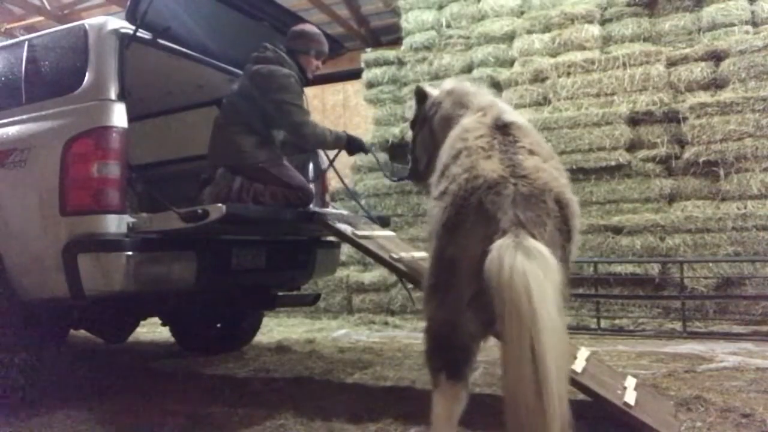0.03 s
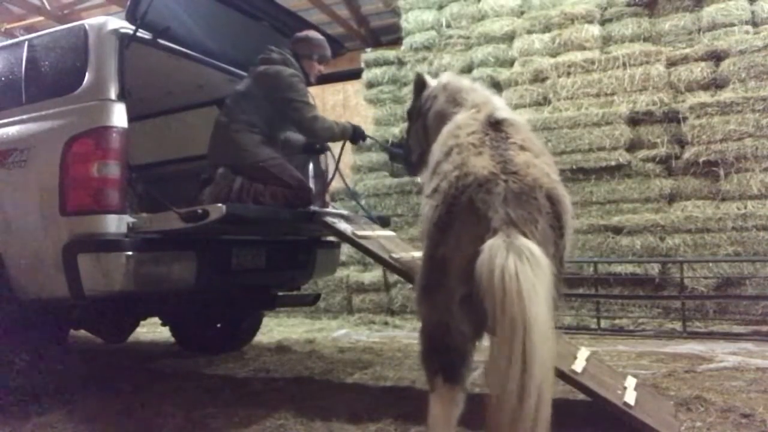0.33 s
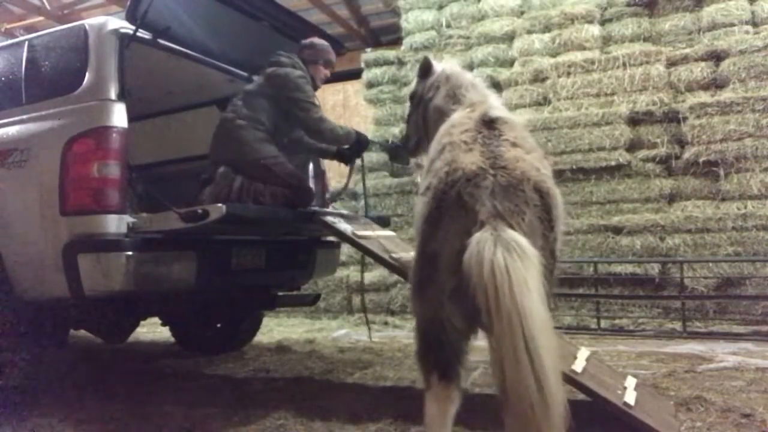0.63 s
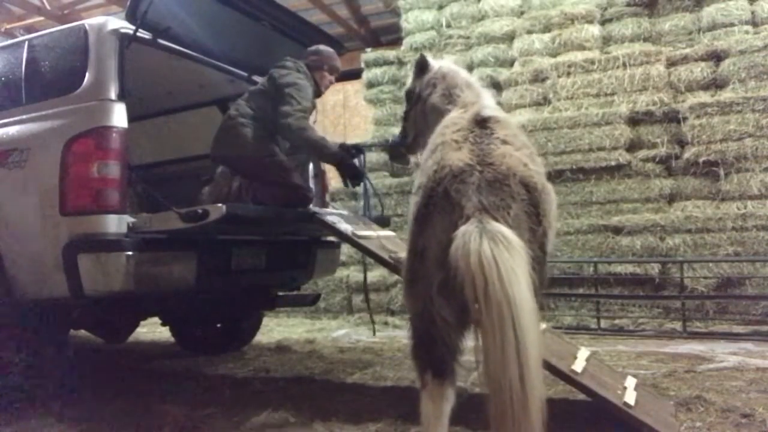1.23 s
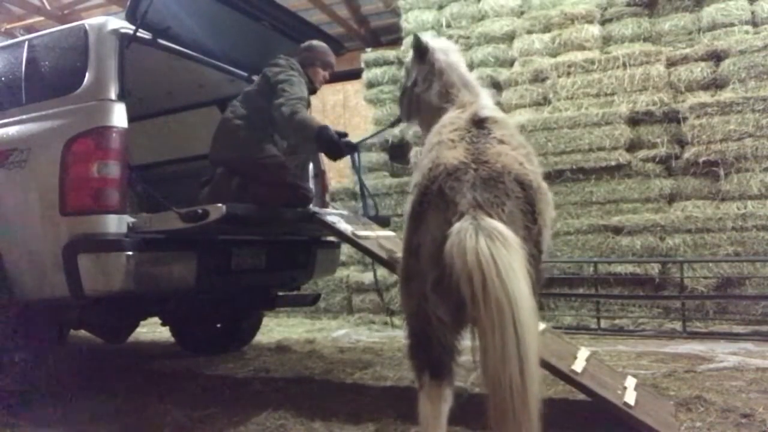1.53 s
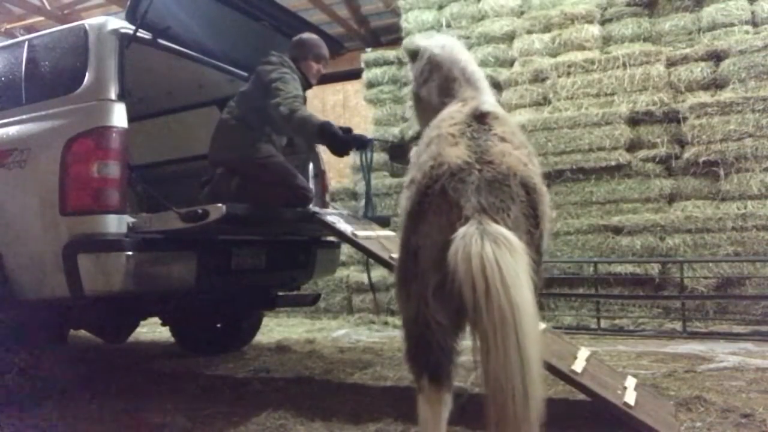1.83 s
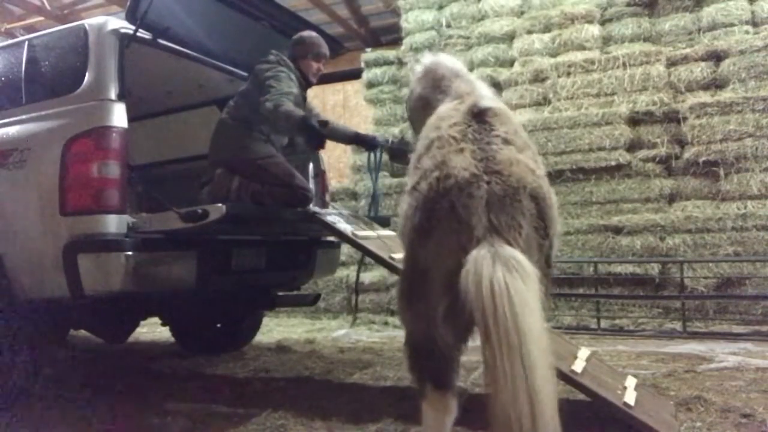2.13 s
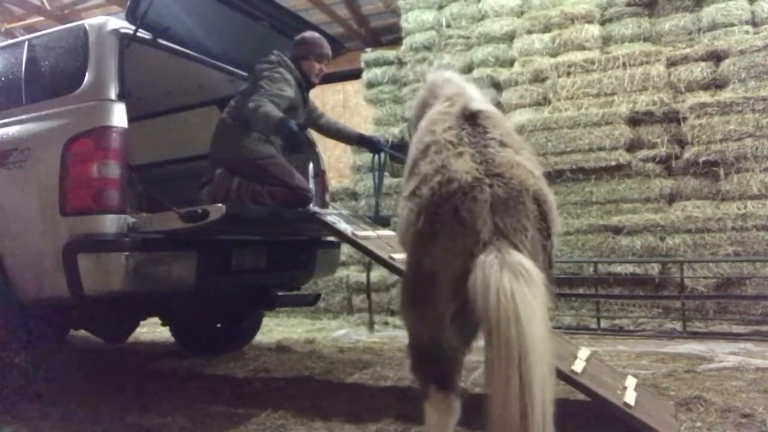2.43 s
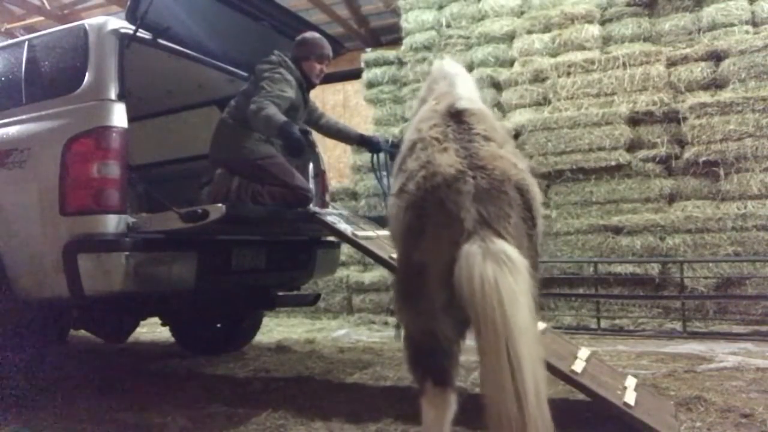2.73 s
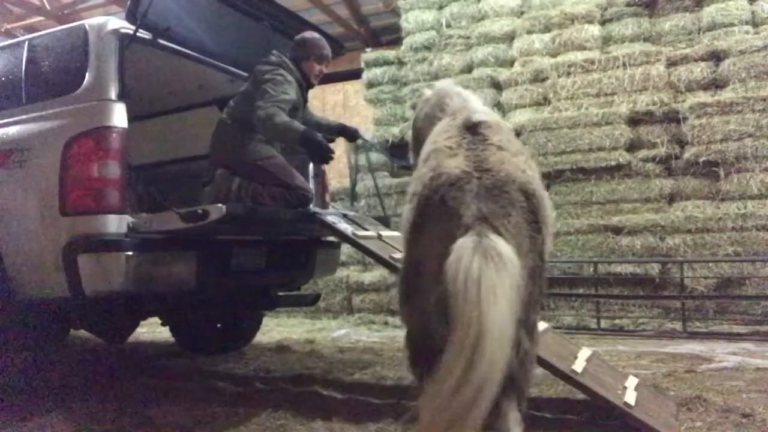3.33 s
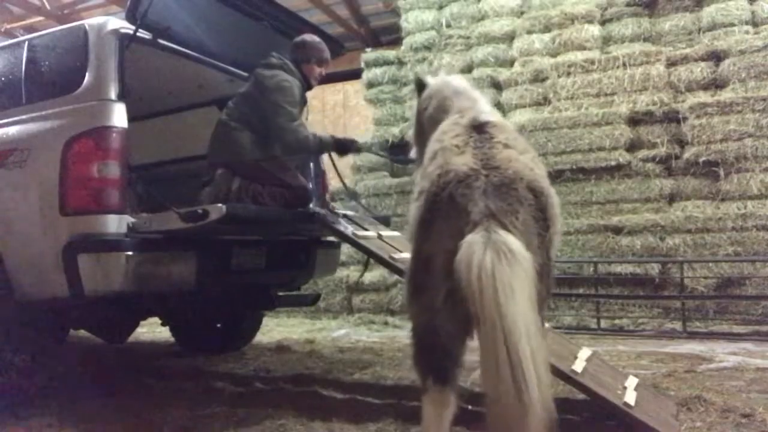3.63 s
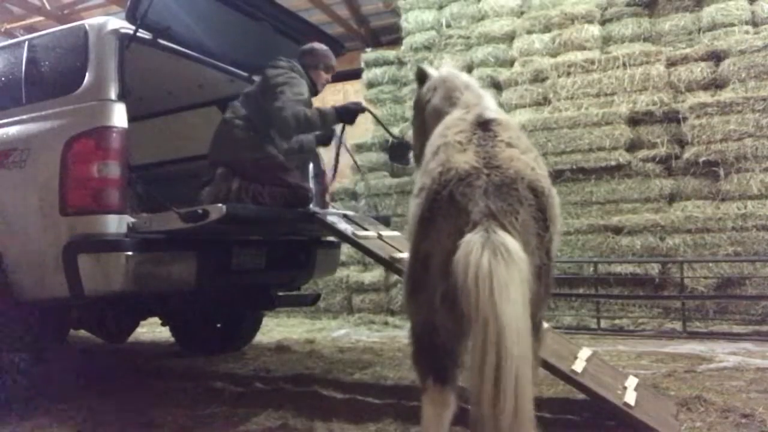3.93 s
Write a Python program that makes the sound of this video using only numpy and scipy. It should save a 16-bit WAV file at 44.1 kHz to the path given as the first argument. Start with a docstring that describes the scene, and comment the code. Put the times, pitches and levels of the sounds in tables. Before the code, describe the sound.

A pony's hooves knock and boom on a wooden ramp in a quiet barn.

```python
"""A pony paws and steps on a wooden ramp that leans on a truck's tailgate, in a quiet hay barn.
First its hooves crack down: the boards boom, the truck sways, loose fittings rattle and the barn rings.
A lull follows, with soft scuffs, a faint hollow clop and ticks of tack and straw. Near 2 seconds a small
metal piece clicks sharply twice. Then come three heavy steps, each a quick cluster of hoof hits.
Still air hisses faintly from start to end."""
import sys
import numpy as np
from scipy import signal
from scipy.io import wavfile

SR = 44100
rng = np.random.default_rng(int(sys.argv[2]) if len(sys.argv) > 2 else 0)


def dump(signal):
    """Clip the signal to [-1, 1] and save it as 16-bit WAV at the path in sys.argv[1]."""
    limited = np.clip(np.atleast_2d(signal).T, -1, 1)
    pcm = np.round(limited * 32767).astype(np.int16)
    wavfile.write(sys.argv[1], SR, pcm)


N = 176400  # 4 seconds

# A gain_db adds to a sound's other decibels. A ring_s is the time it takes to fade by 60 dB.
# Each hoof hit: start_s, rumble_db, thud_db, knock_db, grit_db, clop_hz, clop_db, hardness_db
HOOF_HITS = [(.031, -11, -11, -13.5, -12.5, 800, 0.5, 6.5), (.043, -16, -14, -4.5, -10, 1500, 6, 3.5),
             (.062, 2, -10, -3, -9, 854, -4, 6), (.099, -4, -10.5, -6.5, -11, 340, 7, 5),
             (.126, -5, -6, -11, -32, 335, 9, 2.5), (.15, -11, -10.5, -9.5, -37, 126, 9, -16),
             (.485, -1.5, -25.5, -26.5, -33, 327, 2.5, -12), (.578, -9, -17.5, -19.5, -20, 950, 2, -3.5),
             (1.937, -17, -19, -20, -17, 700, 2, -11), (2.066, -21, -12.5, -26.5, -16, 206, -1.5, -7.5),
             (2.318, -24.5, -18.5, -21, -27, 1260, -2.5, 5), (2.374, -1.5, 6.5, 2.5, 3.5, 1065, 8, -6),
             (2.4413, 8.5, 0.5, -0.5, 1, 1300, 8.5, 3.5), (2.461, -13.5, 6.5, -1, -5.5, 1130, 9, 1.5),
             (2.512, -9, 0.5, -12.5, -25, 1450, -1, -5), (2.781, -10, -15, -19.5, -33, 202, 9.5, -4),
             (2.795, -3, -6.5, -10, -30, 520, 15, 4.5), (2.809, 1, 3.5, -2.5, 2.5, 164, 2.5, 1.5),
             (2.853, 1, -1.5, -5.5, -7, 310, 9, 4), (2.863, 6, -3, -11.5, -12, 635, 10, 3),
             (2.882, -5, -6.5, -11.5, -17, 600, 6, 5.5), (2.976, -6.5, -16.5, -19, -11, 190, 1, -10),
             (3.319, -4.5, -9, -21.5, -30, 204, -2, -0.5), (3.644, 5, -15, -8, -9, 800, 2, 3.5),
             (3.654, -2, 2, -17, -21, 177, 3, 8.5), (3.659, 2, -5.5, -4.5, -5.5, 480, 8, 3),
             (3.683, -3.5, -7, -5.5, -26, 755, 11, 7), (3.714, -9, -16, -9, -25, 1030, 7.5, 4.5)]
HOOF_TONE_HZ = (60, 180, 400, 1400, 2400)  # rumble, thud, low and high end of the knock, grit
CLOP_WIDTH_OCTAVES = 0.4
# The notes the wooden ramp rings with: pitch_hz, gain_db, ring_s
RAMP_NOTES = [(86.6, -38.5, 0.49), (111.6, -46.5, 0.3), (167.4, -25.5, 0.13), (190.24, -28, 0.65),
              (300, -33.5, 0.12), (335, -35.5, 0.47), (515.4, -40.5, 0.34), (575, -37.5, 0.12),
              (706.4, -40.5, 0.27), (809, -40.5, 0.16), (936, -43, 0.24), (988, -49.5, .22),
              (1128, -48.5, 0.29), (1270, -64.5, .28), (1318, -49, 0.12)]
NOTE_SCATTER_DB = 1.5
SWAY_HZ, SWAY_DB, SWAY_RING_S, SWAY_RISE_S = 37.2, -39, 0.71, 0.13
# The tone of hoof striking wood: pitch_hz, gain_db
IMPACT_TONE = [(40, -25), (100, -11.5), (180, -2), (400, -11.5), (1000, -13), (1800, -27), (3500, -25),
               (4800, -37.5), (6000, -54), (15000, -59.5)]
# How long that strike lasts: pitch_hz, ring_s
IMPACT_FADE = [(150, 0.12), (1000, 0.11), (4000, 0.018)]
IMPACT_DB, IMPACT_RISE_S = -51, 0.00044
# The tone of the barn's echo of a hoof: pitch_hz, gain_db
BARN_TONE = [(30, -10), (60, -7), (110, -1.5), (190, 4), (400, -5), (1000, -15), (1800, -23), (4000, -36),
             (5500, -50.5), (15000, -58.5)]
# How long the barn echoes: pitch_hz, ring_s
BARN_FADE = [(40, 1.19), (110, 0.83), (280, 0.48), (740, 0.55), (1940, 0.41), (5120, 0.49), (14000, 0.23)]
BARN_DB, BARN_RISE_S, BARN_BUILD_CYCLES = -55.5, 0.036, 0.62

# Each click of a small metal piece: start_s, gain_db, pitch_ratio, low_clack_db
CLICK_HITS = [(1.9098, -2, 0.92, -0.5), (2.3054, -8.5, 0.94, 10.5)]
# The notes of that piece: base_pitch_hz, gain_db, ring_s
METAL_NOTES = [(1464, -52, 0.099), (2420, -39, .025), (3540, -35.5, 0.025), (3960, -33, 0.014),
               (4340, -37, 0.016), (5360, -66, 0.016)]
# The tone of the dry clack in each click: pitch_hz, gain_db
CLACK_TONE = [(200, -25), (900, -3), (1600, 0.5), (4000, -1.5), (6000, -19.5), (15000, -26)]
CLACK_DB, CLACK_RING_S, CLACK_LOW_HZ, CLACK_HIGH_HZ = -71.5, 0.039, 1210, 4080
# The tone of the barn's echo of a click: pitch_hz, gain_db
CLICK_ECHO_TONE = [(200, 10), (900, 3.5), (1800, 1), (4000, -9), (6000, -18.5), (15000, -25)]
CLICK_ECHO_DB, CLICK_ECHO_RISE_S = -80, 0.024

# Rattles of ramp, tailgate and halter fittings, and one faint hollow clop (second row):
# start_s, pitch_hz, level_db, ring_s
RATTLES_AND_CLOP = [(0.045, 2430, -44, 0.096), (1.126, 740, -58, 0.13), (2.372, 4260, -49.5, 0.064),
                    (2.444, 4750, -51, 0.06), (2.502, 3960, -61.5, 0.31), (2.667, 2570, -63, 0.087),
                    (2.723, 4060, -59, 0.1), (2.806, 2330, -55, 0.067), (3.025, 2590, -63.5, 0.27),
                    (3.613, 2840, -63, 0.33), (3.657, 2750, -42, 0.11)]
RATTLE_Q, RATTLE_RISE_S = 35, 0.0023  # a higher Q gives a purer pitch
# A hoof's sharp crack on wood (first row), then ticks of tack (the pony's gear) and straw:
# start_s, low_gain_db, middle_gain_db, high_gain_db
CRACK_AND_TICKS = [(0.061, 10, 22, -2.5), (.080, 5, 11, -2), (.098, 3, 15.5, -5), (0.299, -20, 6, -15),
                   (0.392, 6, 3, -31), (0.537, 2, 3.5, -27), (0.986, -10, 4.5, -16), (1.122, 7, 2, -5),
                   (1.134, 22.5, -23, -11), (1.308, 10, 4, -0.5), (1.318, 19, -3, -7), (1.939, 0, 12, -0.5),
                   (2.433, 35, 21, -8), (2.468, 1, -1, -2), (2.669, 16, 4, -22), (2.719, -11, 12, -6),
                   (2.731, -5, 8, -8)]
TICK_TONE_HZ = (800, 3500, 12000)  # low, middle, high
TICK_DB, TICK_RING_S = -102, 0.05
# Each scuff or swish: peak_s, rise_s, fall_s, gain_db
SCUFF_SWELLS = [(.02, 0.046, 0.067, 10.5), (.52, 0.3, 0.056, -6.5), (0.932, 0.082, 0.088, -9.5),
                (2.802, .012, 0.019, 6), (3.201, 0.08, 0.088, 3), (3.3, 0.097, 0.044, 2.5),
                (3.644, 0.023, 0.007, 5)]
# The tone of the rubbing: pitch_hz, gain_db
SCUFF_TONE = [(100, 15), (400, 3), (1300, -2.5), (1900, -13), (2700, -7.5), (3500, -13.5), (4500, -13),
              (6500, -27), (15000, -28)]
SCUFF_DB, GRAIN_DB, GRAIN_S = -92.5, 2, 0.003
# The tone of still air and microphone hiss: pitch_hz, gain_db
AIR_TONE = [(25, -14), (45, -1.5), (100, -4), (200, -6.5), (400, -14.5), (1000, -15), (2000, -23.5),
            (5000, -31), (9000, -32.5), (10300, -43.5), (12000, -33), (15500, -46.5)]
AIR_DB = -84.5

# Noise is built from 30 slices of pitch, called bands.
BAND_EDGES_HZ = np.geomspace(24, 17000, 31)
BAND_CENTRES_HZ = np.sqrt(BAND_EDGES_HZ[1:] * BAND_EDGES_HZ[:-1])


def hooves():
    """Each hoof hit cracks on the wood, rings the ramp, rocks the truck and echoes in the barn."""
    times, rumble_db, *_, hardness_db = np.transpose(HOOF_HITS)
    tones = [hoof_tone(*hit[1:-1]) for hit in HOOF_HITS]
    hard_tones = [tone + [0, db] for tone, db in zip(tones, hardness_db)]
    impact = from_db(IMPACT_DB) * bursts(times, hard_tones, IMPACT_TONE, IMPACT_FADE, IMPACT_RISE_S)
    echo = from_db(BARN_DB) * bursts(times, tones, BARN_TONE, BARN_FADE, BARN_RISE_S, BARN_BUILD_CYCLES)
    return impact + ramp_boom(times, tones) + truck_sway(times, rumble_db) + echo


def hoof_tone(rumble_db, thud_db, knock_db, grit_db, clop_hz, clop_db):
    """One hit's (pitch_hz, gain_db) rows: a broad slope and a hollow clop set by where the hoof lands."""
    points = list(zip(HOOF_TONE_HZ, (rumble_db, thud_db, knock_db, knock_db, grit_db)))
    slope = at_pitch(points, BAND_CENTRES_HZ)
    octaves_away = np.log2(BAND_CENTRES_HZ / clop_hz)
    clop = clop_db * np.exp(-(octaves_away / CLOP_WIDTH_OCTAVES) ** 2)
    return np.column_stack([BAND_CENTRES_HZ, slope + clop])


def ramp_boom(times, tones):
    """Every hit rings all the ramp's notes, in a slightly different mix each time."""
    scatter_db = NOTE_SCATTER_DB * rng.standard_normal((len(times), len(RAMP_NOTES)))
    boom = 0
    for k, (hz, db, ring_s) in enumerate(RAMP_NOTES):
        force = from_db(db + scatter_db[:, k] + [at_pitch(tone, hz) for tone in tones])
        boom += (-1) ** k * ring(pulses(times, force), hz, ring_s)  # every other note swings down first
    return boom


def truck_sway(times, rumble_db):
    """The truck body booms slowly under the pony's weight."""
    load = pulses(times, from_db(SWAY_DB + rumble_db))
    short_ring_s = 1 / (1 / SWAY_RING_S + 1 / (SWAY_RISE_S * np.log(1000)))
    # Taking a short ring away from a long one makes the boom swell in.
    return ring(load, SWAY_HZ, SWAY_RING_S) - ring(load, SWAY_HZ, short_ring_s)


def metal_clicks():
    """A small metal piece rings briefly with a dry clack, and the barn echoes it."""
    metal, times, tones = 0, [], []
    for start_s, db, pitch_ratio, low_clack_db in CLICK_HITS:
        for k, (hz, note_db, ring_s) in enumerate(METAL_NOTES):
            tap = pulses([start_s], from_db(db + note_db))
            metal += (-1) ** k * ring(tap, hz * pitch_ratio, ring_s)
        times.append(start_s)
        tones.append([(CLACK_LOW_HZ, db + low_clack_db), (CLACK_HIGH_HZ, db)])
    clack = from_db(CLACK_DB) * bursts(times, tones, CLACK_TONE, [(1, CLACK_RING_S)], IMPACT_RISE_S)
    echo = from_db(CLICK_ECHO_DB) * bursts(times, tones, CLICK_ECHO_TONE, BARN_FADE, CLICK_ECHO_RISE_S)
    return metal + clack + echo


def rattles_and_clop():
    """Noise around one pitch dies away: high for rattling fittings, low for the faint hollow clop."""
    sound = 0
    for start_s, hz, db, ring_s in RATTLES_AND_CLOP:
        age_s = np.maximum(np.arange(N) / SR - start_s, 0)
        noise = signal.lfilter(*signal.iirpeak(hz, RATTLE_Q, fs=SR), rng.standard_normal(N))
        rise = 1 - np.exp(-age_s / RATTLE_RISE_S)
        fade = from_db(db - 60 * age_s / ring_s)
        sound += noise / noise.std() * rise * fade
    return sound


def crack_and_ticks():
    """Short snaps of noise, each with its own tone: a hoof cracks on wood, then tack and straw tick."""
    times = [snap[0] for snap in CRACK_AND_TICKS]
    tones = [list(zip(TICK_TONE_HZ, snap[1:])) for snap in CRACK_AND_TICKS]
    return bursts(times, tones, [(1, TICK_DB)], [(1, TICK_RING_S)], IMPACT_RISE_S)


def scuffs():
    """Grainy rubbing swells and fades as the pony drags a hoof or swings its tail."""
    t = np.arange(N) / SR
    power = 0
    for peak_s, rise_s, fall_s, db in SCUFF_SWELLS:
        width_s = np.where(t < peak_s, rise_s, fall_s)
        power += from_db(db) ** 2 * np.exp(-((t - peak_s) / width_s) ** 2)
    rubbing = sum(band for _, band in noise_bands(SCUFF_TONE))
    grain = np.interp(t / GRAIN_S, np.arange(N), rng.standard_normal(N))
    return np.sqrt(power) * from_db(SCUFF_DB + GRAIN_DB * grain) * rubbing


def still_air():
    """A faint, steady hush lies behind everything."""
    return from_db(AIR_DB) * sum(band for _, band in noise_bands(AIR_TONE))


def bursts(times, hit_tones, shared_tone, fade_table, rise_s, build_cycles=0):
    """A burst of noise after each hit. With build_cycles, low bands take longer to swell."""
    sound = 0
    for hz, noise in noise_bands(shared_tone):
        energy = pulses(times, from_db([at_pitch(tone, hz) for tone in hit_tones]) ** 2)
        fall_s = at_pitch(fade_table, hz) / np.log(1e6)  # 60 dB down is a millionth of the power
        swell_s = 1 / (1 / fall_s + 1 / (rise_s + build_cycles / hz))
        power = fading_tail(energy, fall_s) - fading_tail(energy, swell_s)
        sound += noise * np.sqrt(np.maximum(power, 0))
    return sound


def noise_bands(tone):
    """Give each band's pitch and its noise, as loud as the tone table says (dB per Hz)."""
    white = rng.standard_normal((2, N)) * np.sqrt(SR / 2)  # neighbouring bands use separate noise
    for k, hz in enumerate(BAND_CENTRES_HZ):
        band_filter = signal.butter(2, BAND_EDGES_HZ[k:k + 2], "band", fs=SR, output="sos")
        yield hz, from_db(at_pitch(tone, hz)) * signal.sosfilt(band_filter, white[k % 2])


def ring(kicks, hz, ring_s):
    """Each kick starts a pure note of the same height, which then fades."""
    shrink = from_db(-60 / (ring_s * SR))
    angle = 2 * np.pi * hz / SR
    return signal.lfilter([0, np.sin(angle)], [1, -2 * shrink * np.cos(angle), shrink * shrink], kicks)


def fading_tail(kicks, seconds):
    """Give each kick a tail that falls to about a third in the given time."""
    return signal.lfilter([1], [1, -np.exp(-1 / (seconds * SR))], kicks)


def pulses(times, sizes):
    """Silence with a one-sample kick at each time."""
    kicks = np.zeros(N)
    samples = np.clip((np.asarray(times) * SR).astype(int), 0, N - 1)
    np.add.at(kicks, samples, sizes)
    return kicks + 1e-24


def at_pitch(table, hz):
    """Read between a table's rows, spaced by octaves. A single row holds for every pitch."""
    pitches, values = np.transpose(table)
    return np.interp(np.log(hz), np.log(pitches), values)


def from_db(db):
    """Turn decibels into a number to multiply a sound by."""
    return 10 ** (np.asarray(db) / 20)


def scene():
    """Add up all the sounds in one channel, from the still air to the hooves."""
    mix = still_air() + scuffs() + metal_clicks() + crack_and_ticks() + rattles_and_clop() + hooves()
    return mix[None]


def record(dry):
    """The microphone drops the deepest bass; the highest treble is cut steeply."""
    bass_cut = signal.butter(8, 31, "high", fs=SR, output="sos")
    treble_cut = signal.ellip(10, 0.2, 80, 15750, fs=SR, output="sos")
    return signal.sosfilt(treble_cut, signal.sosfilt(bass_cut, dry))


dry = scene()
out = record(dry)
dump(out)
```